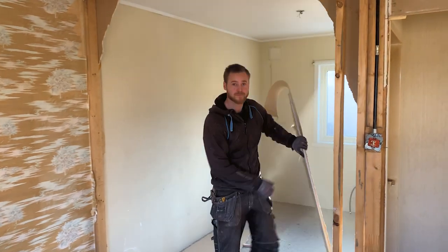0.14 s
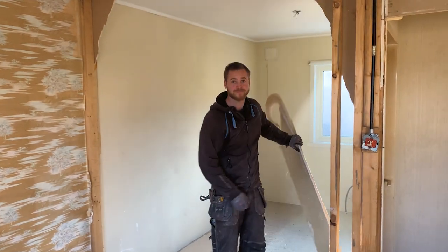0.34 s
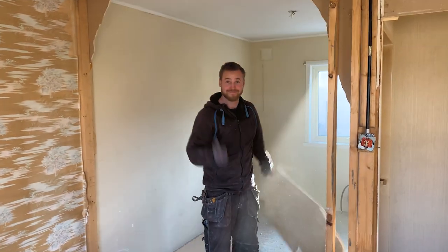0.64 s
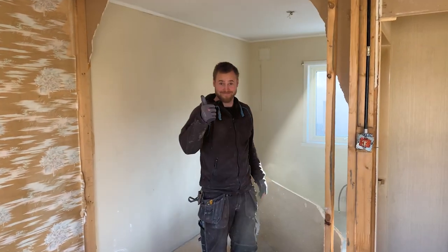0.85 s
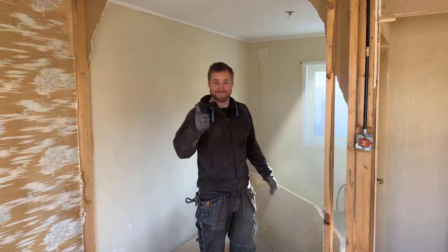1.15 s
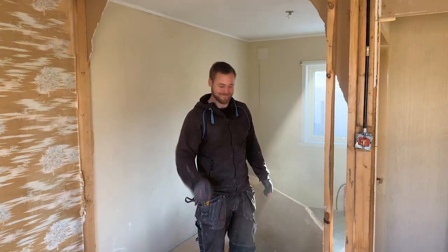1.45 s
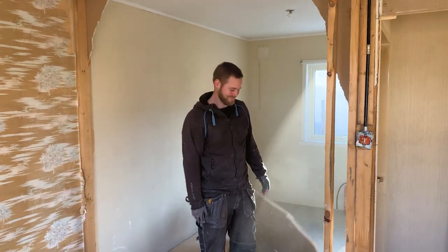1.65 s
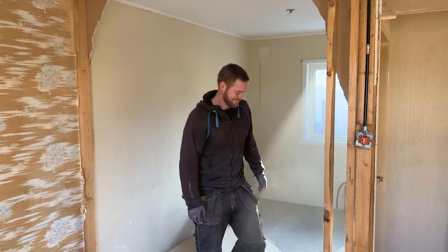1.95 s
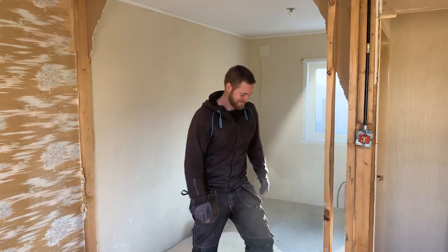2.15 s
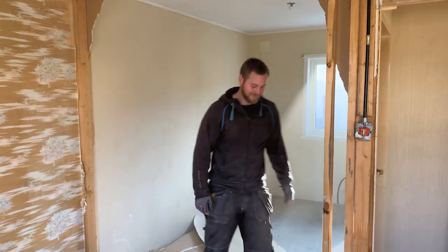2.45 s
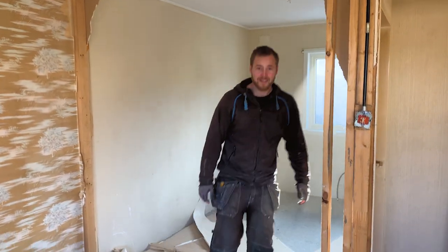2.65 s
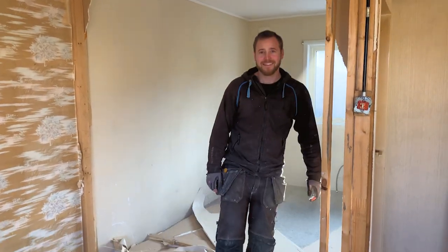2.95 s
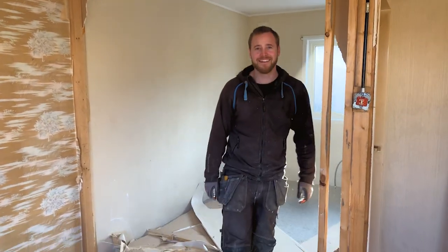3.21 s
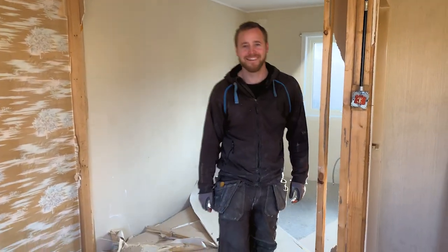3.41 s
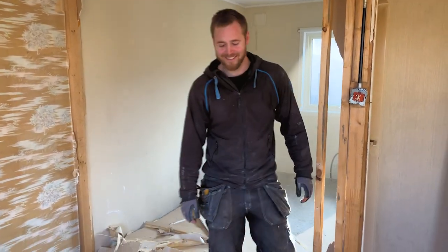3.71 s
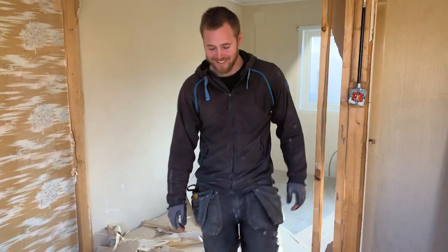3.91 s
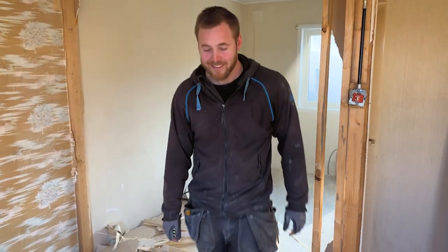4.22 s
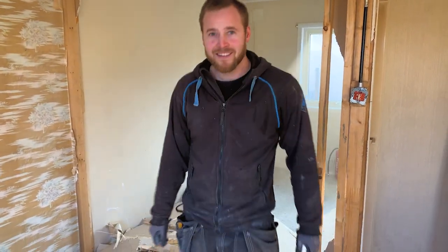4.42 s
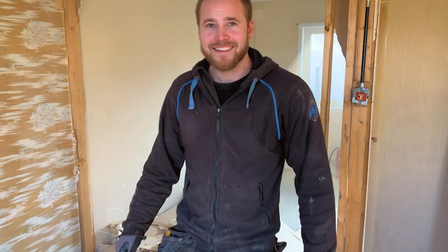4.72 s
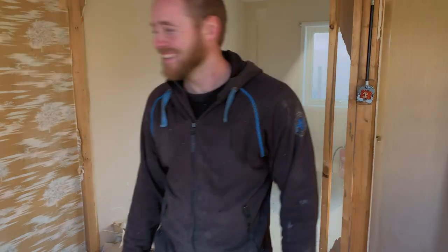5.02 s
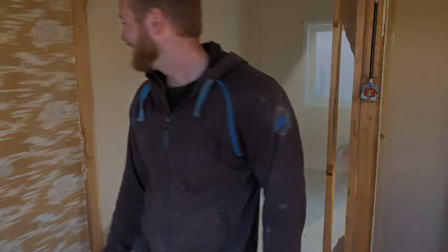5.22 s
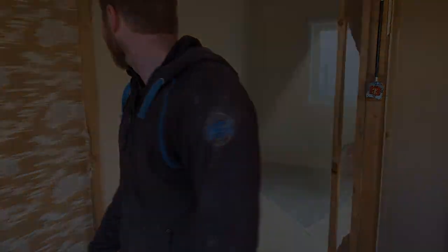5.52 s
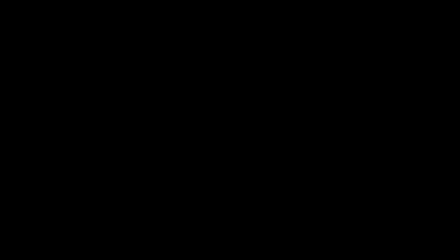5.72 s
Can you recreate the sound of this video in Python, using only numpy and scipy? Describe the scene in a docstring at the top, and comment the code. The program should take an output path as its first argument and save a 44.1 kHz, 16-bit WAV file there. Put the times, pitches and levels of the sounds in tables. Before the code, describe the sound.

Demolition debris is handled indoors: gritty dragging, hollow knocks and faint squeaks, then a sharp crack and a rapid, booming tumble onto the floor. The sheet slides quietly before toppling with a loud, spread slap and a hard clack. Another abrupt boom follows, then the same swish, slap and clack again, fading to quiet hush. Bare walls give a lively short reverberation; the single microphone rounds off the loudest hits.

```python
"""Wall board is pulled loose and thrown down in a bare, gutted room, over scraping grit and a low hush. Wood
knocks (spectrally shaped contact pulses with echoes), and a heavy piece cracks (a falling chirp) and tumbles to
the floor (thuds that ring floor and wall). A sheet topples with a slap (spread contacts and ringing modes),
scraping through grit (noise grains) before a sharp clack. Then the boom of the tumble sounds again, and the
same toppling and clack are heard a second time, exactly alike."""
import sys
import numpy as np
from scipy import signal
from scipy.fft import rfft, irfft
from scipy.io import wavfile

SR = 44100
rng = np.random.default_rng(int(sys.argv[2]) if len(sys.argv) > 2 else 0)


def master_out(mix):
    """Clip the mix to full scale and print it as 16-bit PCM to the path in sys.argv[1]."""
    frames = np.transpose(np.atleast_2d(mix))
    ceiling = np.clip(frames, -1, 1)
    pcm = np.round(ceiling * 32767).astype(np.int16)
    wavfile.write(sys.argv[1], SR, pcm)


N = 258600  # samples in the scene
SIZE = 49152  # samples in one blow
T, HZ = np.arange(SIZE) / SR, np.fft.rfftfreq(SIZE, 1 / SR)  # seconds and Hz of one blow
# whatever starts between these times comes again after the delay (all in seconds)
TWICE_FROM_S, TWICE_TO_S, DELAY_S = 1.03, 3.26, 2.6026

# Cracks of stiff board. Each row: start in seconds, level in dB, ring pitch in Hz, ring width in Hz,
# snap gain in dB, lag of the 1 kHz bending wave in seconds, room gain in dB.
CRACK_EVENTS = [(0.8287, 11, 2500, 520, -16.5, 0.0099, -7.5), (2.1118, 8.5, 1900, 1400, -15, .008, -10),
                (2.7980, 9, 3030, 900, -14, 0.0046, -4)]


def amp(db):
    """Level as a logarithm: 20 dB is a factor of ten in amplitude."""
    return 10 ** (np.asarray(db) / 20)


def unit(x):
    """Energy as the sum of squares, scaled here to 1."""
    return x / (np.linalg.norm(x) + 1e-12)


def read(points, hz):
    """Interpolation on a log-frequency axis, on which octaves are evenly spaced."""
    table_hz, value = np.transpose(points)
    return np.interp(np.log(hz + 1), np.log(table_hz + 1), value)


def below(hz, edge_hz):
    """Second-order roll-off: gain falls 12 dB an octave above the edge (swap the arguments for below it)."""
    return 1 / np.hypot(1, (hz / (edge_hz + 1e-9)) ** 2)


def pulse(gain):
    """Minimum phase: log gain and phase are a Hilbert pair in the shortest causal pulse of a spectrum."""
    log_gain = np.log(np.maximum(gain, 1e-5))
    circle = np.concatenate([log_gain, log_gain[-2:0:-1]])  # both halves of the frequency circle
    spectrum = np.exp(np.conj(signal.hilbert(circle)))
    return unit(irfft(spectrum[:len(HZ)]))


def coloured(x, spectrum):
    """Linear filtering in the frequency domain gives a long signal a spectrum and rms 1."""
    gain = amp(read(spectrum, np.fft.rfftfreq(N, 1 / SR)))
    return np.sqrt(N) * unit(irfft(rfft(x) * gain, N))


def room(build_s=0.0026):
    """Reverberation: dense echoes off bare walls, energy 1, each band decaying by its own T60."""
    # Decay of the room. Each row: frequency in Hz, T60 in seconds.
    decay_times = [(60, 0.72), (160, 0.43), (430, 0.74), (800, 0.62), (1400, 0.57), (2800, 0.37),
                   (5500, 0.35), (9000, 0.23), (15000, 0.2)]
    build = 1 - np.exp(-(T / build_s) ** 2)
    taps = rng.choice([-1., 1.], SIZE) * (rng.random(SIZE) < .2) * build
    hz, t, bands = signal.stft(taps, SR, nperseg=256)
    decay = amp(-60 * t / read(decay_times, hz)[:, None])
    return unit(signal.istft(bands * decay, SR)[1])


def strike(click, length_s, room_db, even_s=0.0004):
    """Distributed contact: one main touch, a swarm that takes over in a long contact, and the room's answer."""
    u = T / max(length_s, 1e-4)
    swarm = unit(rng.standard_normal(SIZE) * u * np.exp(-2 * u))
    # main touch and swarm are equal in energy when the contact lasts even_s
    touches = unit((T == 0) + length_s / even_s * swarm)
    echoes = room() * (1 - np.exp(-u))
    return signal.fftconvolve(click, touches + amp(room_db) * echoes)[:SIZE]


def ringing(click, modes):
    """Modal vibration: a struck body's modes decay exponentially, with energy 1 in all."""
    hum = np.zeros(SIZE)
    for hz, db, t60_s in modes:
        hum += amp(db - 60 * T / t60_s) * np.cos(2 * np.pi * hz * T)
    return unit(signal.fftconvolve(hum, click)[:SIZE])


def add(mix, s, sound):
    """Superposition: a sound adds in at s seconds, and once more if it lies in the stretch that comes twice."""
    starts = [s, s + DELAY_S] if TWICE_FROM_S < s < TWICE_TO_S else [s]
    for start in starts:
        part = mix[max(round(start * SR), 0):][:len(sound)]
        part += sound[:len(part)]


def strokes(table, rise_s, sag_db_per_s, release_db_per_s):
    """Friction envelope: each stroke rises, sags as it slows and dies away on stopping; powers add."""
    power = np.zeros(N)
    for start, length_s, db in table:
        rise = np.minimum(T / rise_s, 1) if start > 0 else 1  # a stroke at time 0 is already under way
        fade_db = sag_db_per_s * T + release_db_per_s * np.maximum(T - length_s, 0)
        add(power, start, (rise * amp(db - fade_db)) ** 2)
    return np.sqrt(power)


def scrape(grains_per_s=3000, spread_db=4.0, rub=0.5, room_db=-5):
    """Granular noise: plaster crumbs crunch under the sliding board and trickle from each crack."""
    # Board dragged through grit. Each row: start in seconds, length in seconds, level in dB.
    drags = [(0.0, .8, -50.5), (0.055, .17, -47.5), (0.555, .14, -48), (0.79, .03, -43), (0.95, .09, -41),
             (1.1, .38, -58), (1.92, .07, -53), (1.99, .08, -37.5), (2.076, .035, -25.5), (2.2, .56, -52),
             (2.345, .15, -42), (2.58, .06, -43), (3.2, .14, -64), (3.335, .04, -43.5), (3.4, .27, -52.5)]
    # Spectrum of the crunch. Each row: frequency in Hz, density in dB per Hz.
    grit_spectrum = [(40, -13.5), (150, 4), (450, 6), (1000, -1), (2500, -2.5), (5000, -10), (9000, -13),
                     (12000, -23), (16000, -17.5)]
    dragged = strokes(drags, rise_s=.024, sag_db_per_s=8, release_db_per_s=140)
    spills = [(s, 0, -39) for s, *_ in CRACK_EVENTS]  # level in dB
    spilled = strokes(spills, rise_s=.024, sag_db_per_s=0, release_db_per_s=88)
    loudness = amp(spread_db * np.minimum(rng.exponential(1, N), 3.5))
    grains = loudness * (rng.random(N) < grains_per_s / SR)
    texture = coloured((grains + rub) * rng.standard_normal(N), grit_spectrum)
    crunch = texture * np.hypot(dragged, spilled)
    return crunch + amp(room_db) * signal.fftconvolve(crunch, room())[:N]


def air():
    """Broadband noise: the sheet's face slides with a soft swish over the low hush of the house."""
    # Light slides of the sheet's face. Each row: start in seconds, length in seconds, level in dB.
    slides = [(0.0, .05, -53.5), (1.035, .38, -49.5), (1.47, .12, -52.5), (1.72, .22, -46), (2.3, .42, -51),
              (3.13, .3, -60), (3.38, .16, -54)]
    # Spectra of swish and hush. Each row: frequency in Hz, density in dB per Hz.
    swish_spectrum = [(100, -5), (500, -13), (1300, -2.5), (2600, 5.5), (4500, 0), (6500, -9.5),
                      (10000, -23), (16000, -39)]
    hush_spectrum = [(25, -2), (90, -1.5), (200, -9), (330, -5), (600, -6.5), (1500, -6.5), (5000, -27),
                     (16000, -62.5)]
    sliding = strokes(slides, rise_s=.11, sag_db_per_s=10, release_db_per_s=52)
    swish = coloured(rng.standard_normal(N), swish_spectrum) * sliding
    hush = amp(-57.5) * coloured(rng.standard_normal(N), hush_spectrum)
    return swish + hush


def knock(db, low_hz, high_hz, tick_db=-23):
    """Impact: a piece's size sets lowest pitch and contact time, the blow's hardness the highest pitch."""
    # Spectrum of struck wood. Each row: frequency in Hz, density in dB per Hz.
    wood_spectrum = [(100, 11), (400, 0), (1000, -4.5), (1800, -11.5), (3000, -12), (6000, -15.5),
                     (9000, -15.5), (15000, -34)]
    hardness = below(HZ, high_hz) + amp(tick_db)
    click = pulse(amp(read(wood_spectrum, HZ)) * below(low_hz, HZ) * hardness)
    # smaller pieces touch more briefly and stir the room less
    contact_s = .0046 * np.sqrt(500 / low_hz)
    room_db = 3.6 - .0009 * low_hz
    return amp(db) * strike(click, contact_s, room_db)


def thud(db, high_hz, ring_db, tick_db=-40, room_db=-2):
    """Forced vibration: a soft, heavy push sets the modes of floor and wall ringing."""
    # Spectrum of the push. Each row: frequency in Hz, density in dB per Hz.
    floor_spectrum = [(25, -49), (55, -8.5), (100, -2.5), (160, 4), (320, 1), (600, -2), (1200, -8),
                      (2500, -11.5), (6000, -13), (15000, -17)]
    # Modes of floor and stud wall. Each row: frequency in Hz, level in dB, T60 in seconds.
    floor_modes = [(51, -15.5, .5), (76.7, -9, 0.94), (108.8, -12.5, 0.39), (139.9, -1.5, 0.48),
                   (166.8, 6, 0.59), (216.9, -6.5, 0.93), (225, -12, 0.37), (278.5, -1, 0.55),
                   (307, -1, 0.45), (376, -18, 0.311), (425, -1.5, 0.45)]
    softness = below(HZ, high_hz) + amp(tick_db)
    push = strike(pulse(amp(read(floor_spectrum, HZ)) * softness), length_s=0.0024, room_db=room_db)
    hum = ringing(pulse(softness * below(HZ, 2000)), floor_modes)
    return amp(db) * (push + amp(ring_db) * hum)


def squeak(db, hz, length_s, width=0.03):
    """Stick-slip friction: rubbing board gives a brief, fuzzy whistle, a narrow band about its pitch."""
    whistle = pulse(below(HZ - hz, width * hz))
    return amp(db) * strike(whistle, length_s, room_db=-8.5)


def crack(db, ring_hz, width_hz, snap_db, lag_s, room_db, snap_hz=7000, slowest_hz=450):
    """Dispersion: bending waves run faster at high pitch, so a snap arrives as a short falling chirp."""
    ring = below(2 * (HZ - ring_hz), width_hz)
    snap = amp(snap_db) * below(1600, HZ)
    click = pulse((ring + snap) * below(HZ, snap_hz))
    delay_s = lag_s * np.sqrt(1e3 / np.maximum(HZ, slowest_hz))
    # phase is group delay summed over frequency
    phase = 2 * np.pi * np.cumsum(delay_s) * HZ[1]
    chirp = irfft(rfft(click) * np.exp(-1j * phase))
    echoes = signal.fftconvolve(chirp, room())[:SIZE]
    return amp(db) * (chirp + amp(room_db) * echoes)


def tumble(count=7):
    """Repeated impacts: the falling piece thuds ever slower and softer, ringing more, fading at the end."""
    u = np.linspace(0, 1, count) ** 1.52  # the gaps widen
    start_s = 0.837 + 0.172 * u
    db = 17 - 10.5 * u ** 3
    high_hz = 570 + (440 - 570) * u
    ring_db = -4.5 + (4 + 4.5) * u
    return list(zip(start_s, db, high_hz, ring_db))


def slap(db, low_hz, length_s, room_db, ring_db=-4):
    """Extended source: a broad sheet lands at many points, first bright, then deep and booming."""
    # Spectrum of the landing sheet. Each row: frequency in Hz, density in dB per Hz.
    sheet_spectrum = [(30, 15), (130, 0.5), (240, 7), (380, 1), (700, -4), (1400, -8), (2400, -9.5),
                      (4200, -22.5), (8000, -26), (12000, -34.5), (16000, -39)]
    # Modes of the flexing sheet. Each row: frequency in Hz, level in dB, T60 in seconds.
    sheet_modes = [(229, 7, 0.49), (272, 5.5, 0.76), (374.6, -2, .4), (445, -2.5, 1), (533, -6, .5),
                   (698, -0.5, 0.44), (1038, -15, 0.59), (1252, -21, 0.99), (1300, -11, .4),
                   (1524, -10.5, 0.38), (1823, -12, 0.69), (2060, -10, .35)]
    low_cut = below(low_hz, HZ)
    click = pulse(amp(read(sheet_spectrum, HZ)) * low_cut)
    flex = ringing(pulse(low_cut * below(HZ, 2500)), sheet_modes)
    return amp(db) * (strike(click, length_s, room_db) + amp(ring_db) * flex)


def scene():
    """Superposition of all blows over the scraping and the air."""
    # Knocks of wood and board; the three rows near 2.8 s are the onset, treble and body of the sharp clack.
    # Each row: start in seconds, level in dB, lowest and highest pitch in Hz.
    knocks = [ (0.108, -11.5, 1700, 8000), (0.168, -21, 5000, 12000), (0.2143, 8.5, 330, 1200),
              (0.238, 5, 223, 440), (0.332, 3, 470, 7000), (0.633, -6, 850, 1500), (0.897, -1.5, 500, 6100),
              (1.026, -16.5, 7000, 15000), (2.0, -18, 500, 6000), (2.211, 0.5, 700, 2400),
              (2.296, 2, 260, 460), (2.478, -12.5, 700, 4500), (2.511, -5.5, 168, 330),
              (2.748, -15.5, 2600, 7000), (2.7965, -11, 2500, 8000), (2.802, -3.5, 5400, 8000),
              (2.803, 2, 340, 680), (3.364, -8, 1160, 1700), (3.375, -18.5, 4500, 8000)]
    # Heavy blows on the floor, and at 3.685 s the boom of the tumble breaking in again.
    # Each row: start in seconds, level in dB, highest pitch in Hz, ringing of floor and wall in dB.
    thuds = [(0.344, -5, 73.5, 9), (0.565, -5.5, 88, -4), (1.365, -11, 55, -6), (2.132, -0.5, 60.5, 7),
             (2.808, -0.5, 190, 2.5), (3.372, -10.5, 230, -4), (3.685, 5.5, 480, 6.3)]
    # Squeaks of rubbing board. Each row: start in seconds, level in dB, pitch in Hz, length in seconds.
    squeaks = [(0.57, -23, 4960, 0.027), (0.612, -18.5, 3440, .025), (2.613, -22, 8000, 0.0098),
               (2.645, -18, 3280, .012)]
    # The sheet lands, edge first and then flat. Each row: start in seconds, level in dB,
    # lowest pitch in Hz, contact time in seconds, room gain in dB.
    slaps = [(2.100, 14, 1100, 0.021, -16), (2.119, 15.5, 150, 0.0032, -1), (2.138, 9, 120, .004, -1),
             (2.155, 13, 200, 0.0092, 0)]
    mix = air() + scrape()
    sources = [(knock, knocks), (thud, thuds + tumble()), (squeak, squeaks),
               (crack, CRACK_EVENTS), (slap, slaps)]
    for source, table in sources:
        for s, *blow in table:
            add(mix, s, source(*blow))
    return mix[None]


def record(dry, low_cut_hz=42, ceiling=.72, edge_hz=15950):
    """Band-limited, saturating pickup: a microphone drops the deepest bass and rounds the loudest peaks."""
    low_cut = signal.butter(2, low_cut_hz, "highpass", fs=SR, output="sos")
    thinned = signal.sosfilt(low_cut, dry)
    rounded = thinned / (1 + (thinned / ceiling) ** 6) ** (1 / 6)
    band_limit = signal.firwin(511, edge_hz, window=("kaiser", 9), fs=SR)
    return signal.oaconvolve(rounded, band_limit[None], "same")


dry = scene()
out = record(dry)
master_out(out)
```